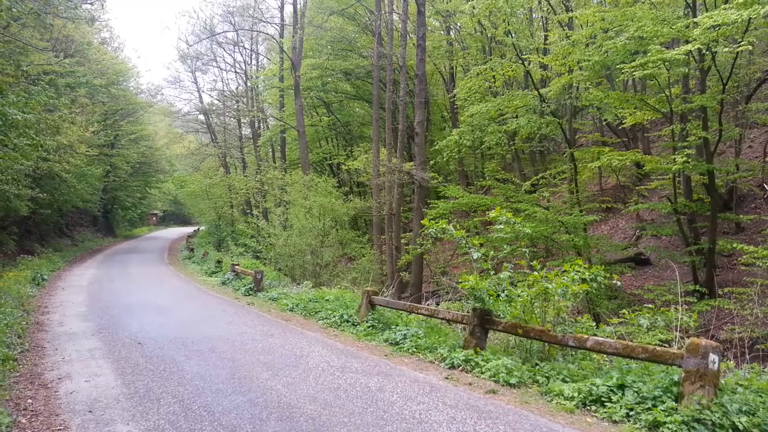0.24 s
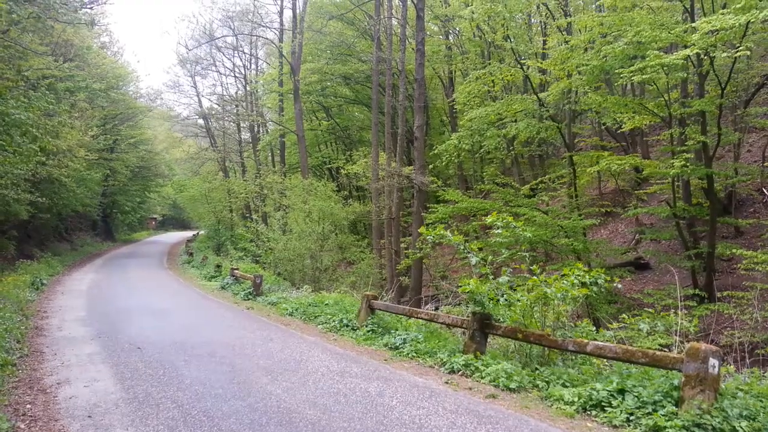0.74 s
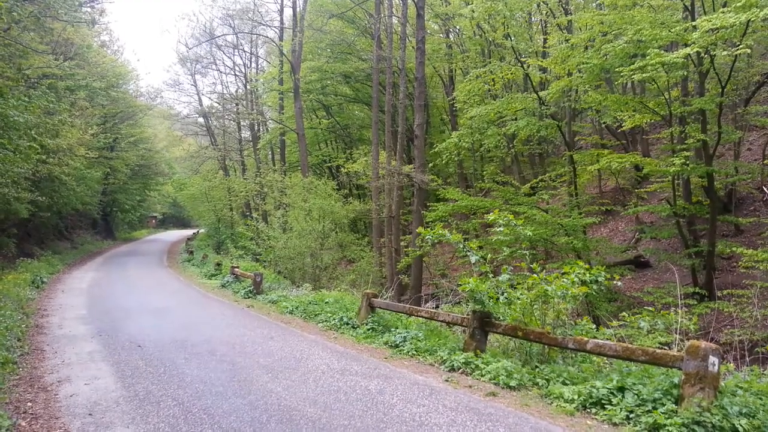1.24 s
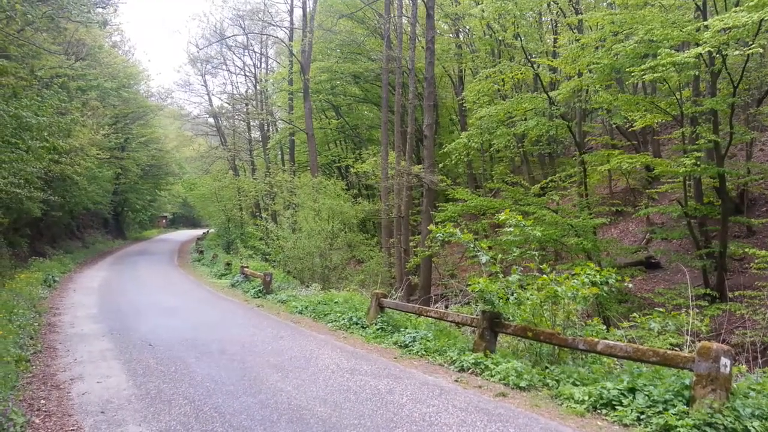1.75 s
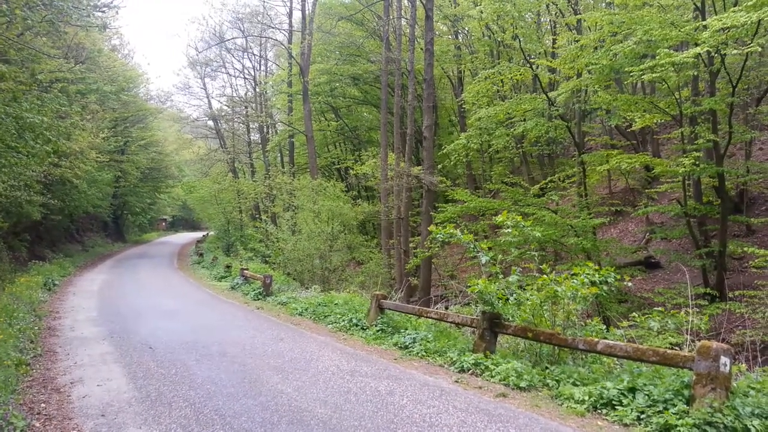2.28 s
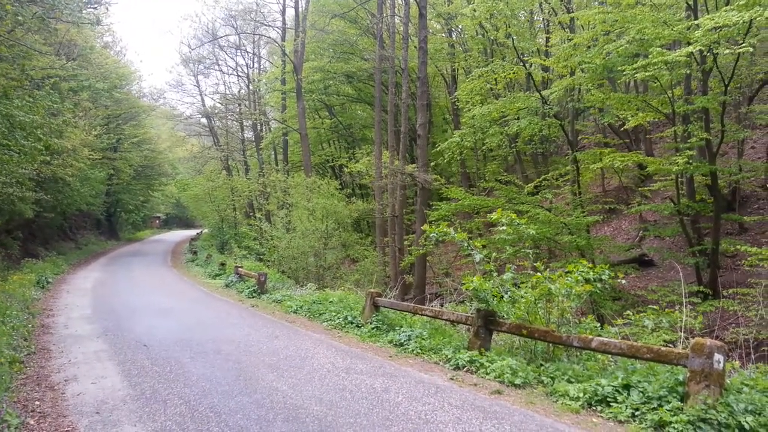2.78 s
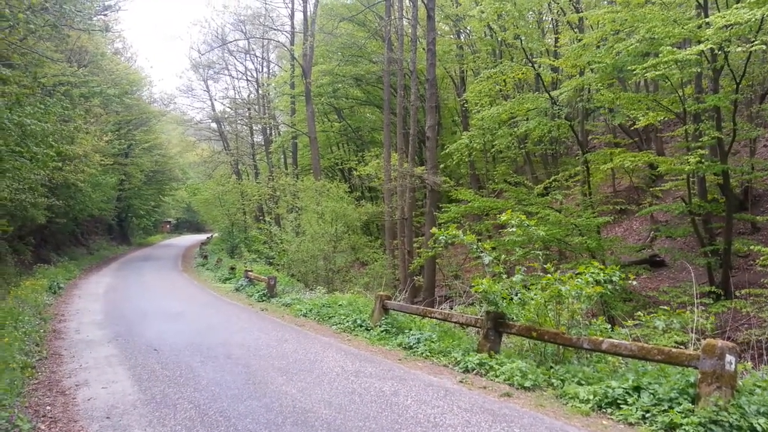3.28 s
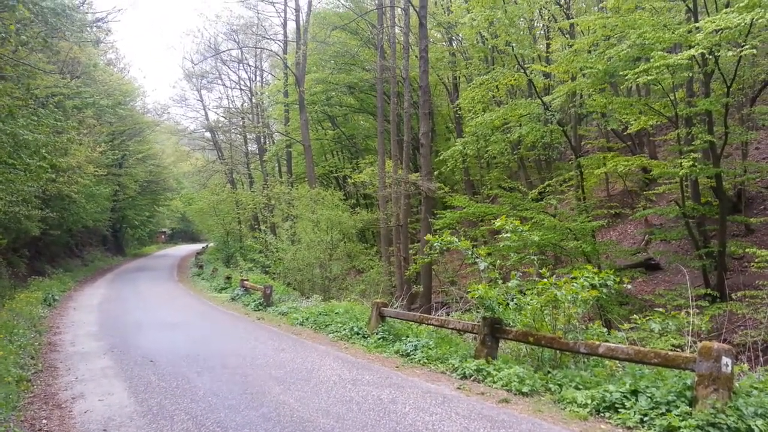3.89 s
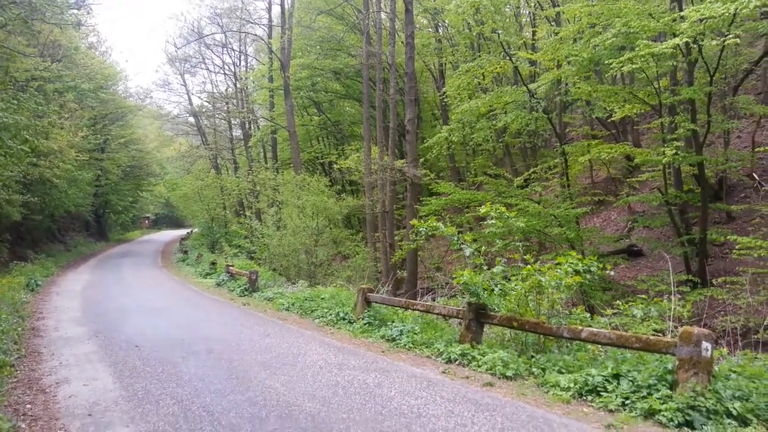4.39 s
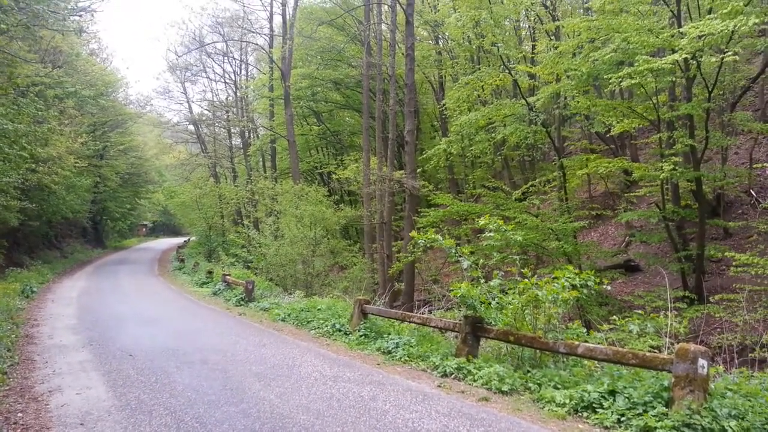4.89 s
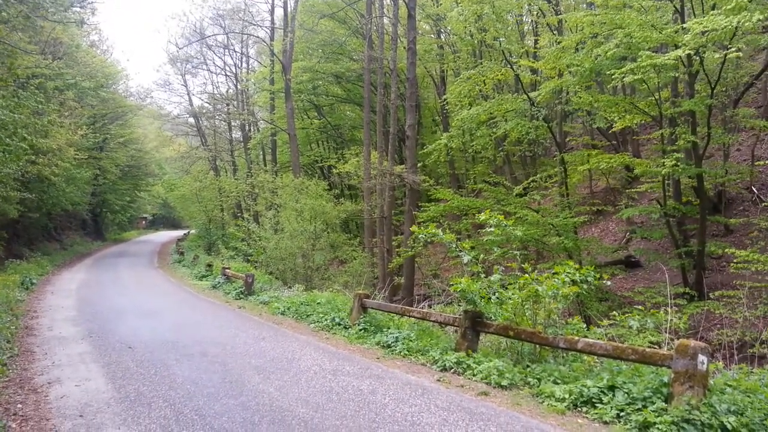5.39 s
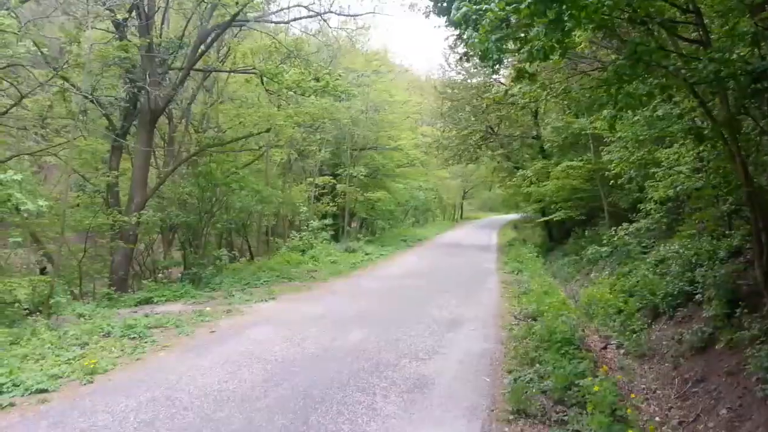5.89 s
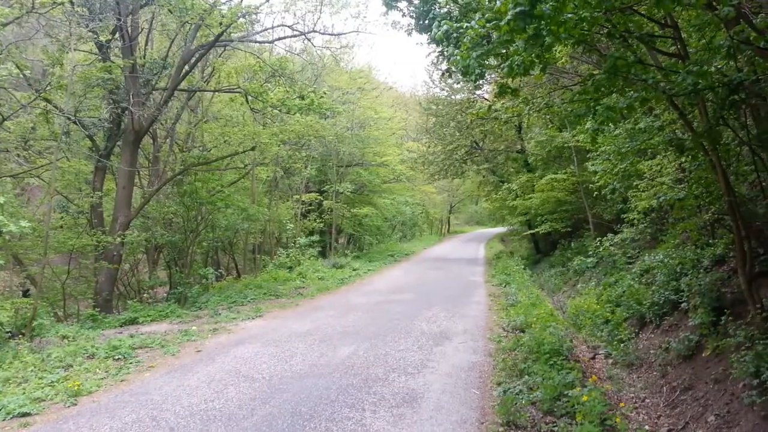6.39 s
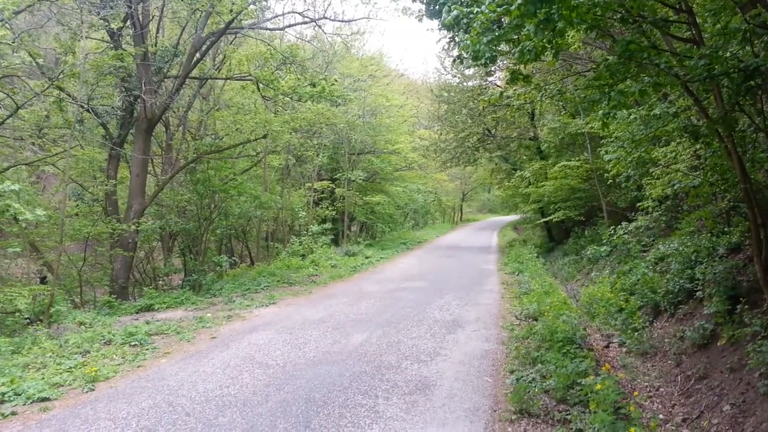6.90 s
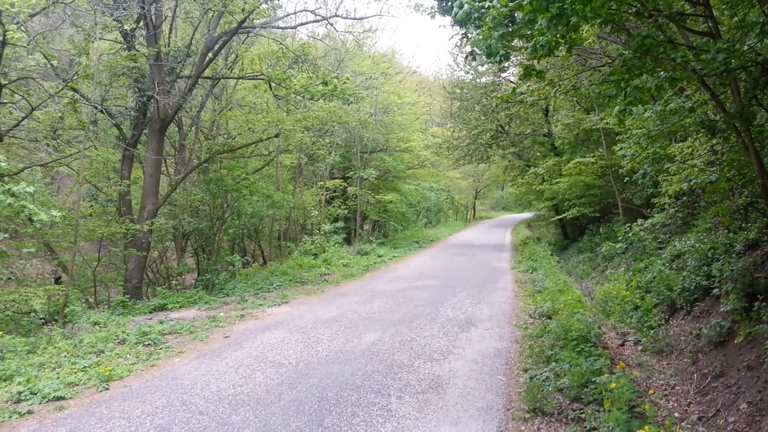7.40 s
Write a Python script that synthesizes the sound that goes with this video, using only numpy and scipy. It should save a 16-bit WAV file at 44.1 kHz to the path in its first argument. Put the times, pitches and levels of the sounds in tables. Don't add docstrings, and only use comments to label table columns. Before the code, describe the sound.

Several songbirds sing in a leafy wood beside a quiet lane: low fluting whistles, sharp high calls, thin wiry notes and short burrs, echoing off trunks. Leaves rush softly throughout. Low wind bursts thump the right side of a handheld microphone, hardest near two and a half seconds and again from four to nearly six. Plastic clicks dot the handling, one very loud; then the spot changes and it grows calmer.

```python
import sys
import numpy as np
from scipy import signal
from scipy.fft import rfft, irfft, next_fast_len
from scipy.io import wavfile
from scipy.ndimage import uniform_filter1d, map_coordinates

SR = 44100
rng = np.random.default_rng(int(sys.argv[2]) if len(sys.argv) > 2 else 0)


def file_out(sig):
    cols = np.atleast_2d(sig).T
    lim = np.clip(cols, -1, 1)
    pcm = np.round(lim * 32767).astype(np.int16)
    wavfile.write(sys.argv[1], SR, pcm)


def field_ratio(decibels):
    return 10 ** (np.asarray(decibels, dtype=float) / 20)


N = 337365
MOVE_S = 5.806


def unit(x):
    return x / np.sqrt(np.mean(x ** 2) + 1e-20)


def along(points, hz):
    f, v = np.transpose(points)
    return np.interp(np.log(hz + 1), np.log(f + 1), v)


def wobble(rate_hz, size=N):
    knots = rng.standard_normal(800 if size == N else 48)
    return map_coordinates(knots, [np.arange(size) * rate_hz / SR], mode="mirror")


def filtered(x, response):
    m = next_fast_len(N + SR // 2)
    return irfft(rfft(x, m) * response(np.fft.rfftfreq(m, 1 / SR)), m)[..., :N]


def spans(rows, edge_s):
    t = np.arange(N) / SR
    return [np.clip(np.minimum(t - s, s + length_s - t) / edge_s + 0.5, 0, 1) for s, length_s, *_ in rows]


def bumps(rows):
    t = np.arange(0, N, 32) / SR
    total = sum(top * np.exp(-((t - s) / abs(half_s)) ** 2) for s, half_s, top in rows)
    return np.interp(np.arange(N) / SR, t, total)


def add(track, s, sound, db, pan_db, lag=0):
    pan_db = np.clip(pan_db, -20, 20)
    for side, sign in enumerate((1, -1)):
        spot = track[side, round(s * SR) + side * lag:][:len(sound)]
        spot += field_ratio(db + sign * pan_db / 2) * sound[:len(spot)]


def clock(length_s):
    return np.arange(int(length_s * SR)) / SR


def whistle(hz, edge, lean):
    size = len(hz)
    u = np.linspace(0, 1, size)
    phase = 2 * np.pi * np.cumsum(hz * (1 + 0.0022 * wobble(82.0, size=size))) / SR
    swell = np.sin(np.pi * u ** lean) ** edge * unit(field_ratio(1.6 * wobble(60, size=size)))
    return swell * (np.sin(phase) + 0.036 * np.sin(2 * phase))


def held_notes():
    # start_s, length_s, pitch_hz, level_db (the same columns below)
    flute = [(0.413, 0.027, 2070, -61), (0.443, 0.1, 2072, -54.5), (0.85, 0.036, 2070, -56.5),
             (0.9, 0.04, 2000, -72), (1.235, 0.12, 2250, -66), (1.33, 0.18, 2620, -69),
             (1.875, 0.063, 1690, -56.5), (2.546, 0.056, 2130, -45), (2.6, .05, 2120, -51),
             (2.73, .03, 2120, -56), (3.17, 0.13, 2600, -63)]
    # start_s, length_s, pitch_hz, level_db
    rival = [(5.525, 0.1, 1862, -57)]
    # start_s, length_s, pitch_hz, level_db
    tit = [(0.1, 0.13, 4330, -62), (1.247, 0.065, 4400, -44), (1.449, 0.037, 4420, -45),
           (1.497, 0.026, 4423, -46)]
    # start_s, length_s, pitch_hz, level_db
    moved = [(5.807, 0.064, 2657, -56), (5.885, 0.062, 2658, -61), (5.925, .035, 2340, -62),
             (5.986, 0.042, 2351, -40.5), (6.055, 0.045, 2320, -51), (6.125, 0.083, 2626, -57),
             (6.27, 0.046, 2370, -64.5)]
    # start_s, length_s, pitch_hz, level_db
    seep = [(0.145, 0.14, 8356, -58), (3.738, 0.12, 8310, -53.5), (6.585, 0.15, 8220, -76)]
    # start_s, length_s, pitch_hz, level_db
    pipe = [(1.195, 0.06, 5160, -67), (3.2, 0.075, 5030, -61), (3.42, 0.14, 4800, -73),
            (3.6, 0.07, 4970, -62), (3.66, 0.083, 4950, -66), (7.195, 0.09, 4950, -70),
            (7.285, 0.077, 4990, -59), (7.36, 0.089, 4920, -68)]
    # start_s, length_s, pitch_hz, level_db
    far = [(2.91, 0.13, 3605, -65), (6.47, 0.042, 4315, -59), (7.012, 0.09, 3214, -65.5),
           (7.125, 0.061, 3201, -64), (7.19, 0.077, 3230, -70)]
    # notes, start_pitch_ratio, slide_s, pan_db (left-right), echo_db, right_lag_samples
    singers = [
        (flute, 0.98, 0.004, -3, -5, 15),
        (rival, 0.96, 0.006, -14, -3, 7),
        (tit, 0.99, 0.004, 0, -5, 4),
        (moved, 0.98, 0.004, 2.5, -6, 2),
        (seep, 1.053, 0.0071, -20, -1, 3),
        (pipe, 0.98, 0.008, 11, -3, 8),
        (far, 1.005, 0.014, -2, -3, 11),
    ]
    notes = []
    for rows, scoop, slide_s, pan_db, echo_db, lag in singers:
        for s, length_s, hz, db in rows:
            pitch_hz = hz * (1 + (scoop - 1) * np.exp(-clock(length_s) / slide_s))
            notes.append((s, whistle(pitch_hz, edge=0.43, lean=0.52), db, pan_db, echo_db, lag))
    return notes


def gliding_notes():
    # start_s, length_s, from_hz, to_hz, level_db
    flute = [(0.182, 0.09, 1900, 1660, -75), (0.54, 0.037, 1933, 1750, -61),
             (0.79, 0.11, 2363, 2330, -64.5), (1.05, 0.076, 1590, 1800, -68.5),
             (1.954, 0.025, 1550, 1410, -56.5), (2.08, 0.076, 2183, 2024, -53),
             (2.15, 0.079, 1988, 1940, -51), (2.225, 0.05, 1984, 1923, -59), (2.25, 0.078, 1930, 1775, -58),
             (2.365, 0.025, 2750, 2720, -54), (2.41, .03, 2760, 2640, -58), (2.527, 0.03, 1720, 2115, -48),
             (2.825, 0.015, 600, 715, -51), (2.84, 0.034, 2040, 2190, -60), (2.85, 0.031, 2490, 2630, -57),
             (2.85, 0.035, 1730, 1790, -63), (2.55, 0.027, 1960, 2050, -58), (5.825, 0.02, 2250, 2490, -53),
             (6.1, 0.03, 2360, 2570, -69)]
    # start_s, length_s, from_hz, to_hz, level_db
    rival = [(5.722, 0.085, 2460, 2050, -56.5)]
    # start_s, length_s, from_hz, to_hz, level_db
    warbler = [(1.21, 0.015, 5400, 6350, -63), (1.31, 0.23, 8340, 7570, -74),
               (1.413, 0.02, 5400, 6700, -60), (3.18, 0.049, 6300, 6580, -58.5),
               (3.215, 0.063, 6600, 6680, -57), (3.29, 0.12, 6750, 7200, -65.5),
               (3.54, 0.06, 7050, 6740, -66), (3.6, 0.048, 6680, 6560, -62), (3.66, 0.042, 6560, 6240, -65),
               (3.772, 0.017, 7260, 5800, -59), (3.846, 0.018, 7270, 6600, -64),
               (4.03, 0.014, 6500, 7000, -60), (4.042, 0.0081, 7120, 6530, -61),
               (6.64, 0.099, 8350, 8260, -76)]
    # start_s, length_s, from_hz, to_hz, level_db
    pipe = [(2.24, 0.2, 5600, 5500, -60), (3.535, 0.032, 3500, 4570, -63), (3.57, .03, 4600, 4950, -58),
            (3.791, 0.02, 6000, 4840, -70), (7.295, 0.042, 4980, 4420, -53), (7.335, 0.02, 4560, 5100, -60)]
    # start_s, length_s, from_hz, to_hz, level_db
    plunges = [(1.228, 0.022, 3620, 4380, -61), (1.427, 0.022, 3250, 4380, -60)]
    # start_s, length_s, from_hz, to_hz, level_db
    alarm = [(2.722, 0.036, 6570, 4750, -54), (2.74, 0.012, 7770, 7470, -52),
             (2.748, 0.027, 7540, 4300, -46), (2.773, 0.014, 4330, 4020, -49.5),
             (2.785, 0.027, 4050, 3900, -54), (2.778, 0.043, 6500, 6360, -56)]
    # notes, pan_db (left-right), echo_db, bend (over 1 speeds up), right_lag_samples
    singers = [
        (flute, 9, -4, 1.05, 10),
        (rival, -19, -11, 1.9, 0),
        (warbler, -20, -3.5, 0.95, 3),
        (pipe, 7, -3.5, 1.05, 11),
        (plunges, 0, -15, 0.7, 7),
        (alarm, -1.5, -3, 1.1, 7),
    ]
    notes = []
    for rows, pan_db, echo_db, bend, lag in singers:
        for s, length_s, from_hz, to_hz, db in rows:
            pitch_hz = from_hz + (to_hz - from_hz) * (clock(length_s) / length_s) ** bend
            notes.append((s, whistle(pitch_hz, edge=0.12, lean=0.9), db, pan_db, echo_db, lag))
    return notes


def burred_notes():
    # start_s, length_s, centre_hz, swing_hz, level_db
    burrs = [
        (2.393, 0.17, 2540, 200, -52),
        (3.764, 0.25, 3676, 322, -53.5),
        (5.628, 0.26, 3572, 423, -53),
    ]
    pan_db, echo_db, lag = 4.5, -2.5, 14
    notes = []
    for s, length_s, centre_hz, swing_hz, db in burrs:
        t = clock(length_s)
        cycle = np.cumsum(105 * field_ratio(2.3 * wobble(61.2, size=len(t)))) / SR % 1
        sweep = 1 - 2 * cycle ** 1.3 + 0.227 * wobble(89.9, size=len(t))
        sweep *= np.minimum(1, 0.35 + 3 * t / length_s)
        tone = whistle(centre_hz + swing_hz * sweep, edge=0.59, lean=0.68)
        notes.append((s, 1.49 * np.sin(np.pi * cycle) * tone, db, pan_db, echo_db, lag))
    return notes


def birds():
    direct, sent = np.zeros((2, 2, N)), np.zeros((2, 2, N))
    for s, note, db, pan_db, echo_db, lag in held_notes() + gliding_notes() + burred_notes():
        spot = int(s + len(note) / SR / 2 > MOVE_S)
        add(direct[spot], s, note, db + 0.5, pan_db, lag=lag)
        add(sent[spot], s, note, db + 6.0 + echo_db, pan_db)
    return direct, sent


def echoes(x):
    # pitch_hz, t60_s
    trunks_t60 = [(1500, 0.81), (4500, 0.74), (9000, 0.33)]
    near_db, near_t60_s = 2, 0.16
    hop, out = SR // 3, np.zeros((2, N + 2 * SR))
    for start in range(0, N, hop):
        piece = x[:, start:start + hop]
        if not piece.any():
            continue
        hz, t, z = signal.stft(rng.standard_normal((2, SR * 3 // 4)), SR, nperseg=256)
        decay = field_ratio(-60 * t / along(trunks_t60, hz)[:, None]) + field_ratio(near_db - 60 * t / near_t60_s)
        tail = signal.istft(z * decay, SR, nperseg=256)[1]
        piece = 0.86 * piece + 0.14 * piece[::-1]
        wet = signal.fftconvolve(piece, tail / np.linalg.norm(tail[0]), axes=1)
        wet *= np.linalg.norm(piece, axis=1, keepdims=True) / np.linalg.norm(wet, axis=1, keepdims=True)
        out[:, start + 300:][:, :wet.shape[1]] += wet
    return out[:, :N]


def chorus():
    direct, sent = birds()
    early = np.arange(N) < MOVE_S * SR
    wet = echoes(sent[0]) * early + echoes(sent[1])
    flutter_db = 3 * np.array([wobble(45), wobble(45)])
    return np.where(early, *direct) + wet * field_ratio(flutter_db)


def wind():
    # centre_s, peak_db, pitch_hz
    eddies = [(2.321, -22, 101), (2.36, -31, 130), (2.394, -35, 100), (2.41, -11, 163), (2.428, -38, 130),
              (2.44, -25, 140), (2.454, -30, 98), (2.481, -29, 108), (2.53, -33, 112), (2.566, -29, 107),
              (2.661, -37, 82.5), (2.7, -28.5, 88.5), (3.941, -32.5, 96), (4.03, -38, 96),
              (4.159, -27.5, 103), (4.203, -29, 93.5), (4.438, -33, 120), (4.478, -38, 170),
              (4.52, -38, 85), (4.583, -25.5, 95), (4.632, -35.5, 129), (4.679, -40, 95), (4.734, -32, 94),
              (4.876, -42, 80), (5.13, -33, 100), (5.255, -36, 105), (5.36, -40, 80), (5.49, -31.5, 95),
              (5.589, -33, 95), (5.64, -47, 100), (4.489, -26.5, 140), (4.554, -34, 132), (4.595, -28, 102),
              (4.754, -32, 91), (4.839, -27, 91), (5.01, -36, 95), (5.165, -25, 98), (5.197, -27, 105),
              (5.285, -28, 124), (5.318, -29.5, 107), (5.524, -26.5, 93), (5.549, -26.5, 101),
              (5.671, -25, 104), (5.723, -24, 133), (5.753, -26.5, 109), (5.788, -32, 130)]
    # centre_s, peak_db
    puffs = [
        (0.79, -44),
        (1.89, -28),
        (2.11, -32),
        (7.26, -37),
    ]
    # start_s, length_s, level_db
    spells = [(0, 0.28, -64), (0.74, 0.27, -56), (1.223, 0.52, -57.5), (2.052, 0.3, -61.5),
              (2.28, 0.52, -53), (3.862, 0.52, -57), (4.41, 0.35, -55), (4.84, 0.31, -54.5),
              (5.103, 0.34, -62), (5.486, 0.33, -50), (5.844, 0.62, -70)]
    # pitch_hz, level_db per Hz
    buffet_tone = [(20, -28), (45, -7), (100, 5), (170, -13), (300, -18), (600, -51)]
    swell_db, swell_half_s = -19.5, 0.026
    calm_db, spell_edge_s = -69.5, 0.079
    swells = bumps([(s, swell_half_s, field_ratio(db + swell_db)) for s, db, *_ in [*eddies, *puffs]])
    steady = sum(field_ratio(row[2]) * on for row, on in zip(spells, spans(spells, spell_edge_s)))
    gust = field_ratio(calm_db) + swells + steady
    noise = filtered(rng.standard_normal((2, N)), lambda hz: field_ratio(along(buffet_tone, hz)))
    port = np.zeros((2, N))
    t = np.arange(-2000, 2000) / SR
    for s, db, hz in eddies:
        eddy = np.exp(-(t * hz / 0.61) ** 2) * np.cos(2 * np.pi * hz * t + rng.normal(-0.72, 0.37))
        add(port, s - 2000 / SR, eddy, db - 12.5, -20)
    lumps = unit(noise * field_ratio(2.5 * wobble(18)))
    return port * field_ratio([[-14], [0]]) + lumps * gust * field_ratio([[-20], [0]])


def case_ring(t, hz, side):
    body_hz = 2120
    v = t - 0.0006
    late = v - 0.00007 * side
    modes = np.cos(2 * np.pi * hz * (1 + 0.12 * side) * late)
    modes += (0.06 + 0.2 * side) * np.cos(2 * np.pi * 2.1 * hz * late)
    modes += 0.1 * np.cos(2 * np.pi * 1.75 * hz * v)
    modes += 0.25 * np.cos(2 * np.pi * 0.72 * hz * v + rng.normal(0, 0.5))
    spread_s = np.where(v < 0, 0.00017 + 0.00016 * side, 0.00022 + 0.00022 * side)
    ring = modes / 1.3 * np.exp(-(v / spread_s) ** 2)
    u = np.maximum(t - 0.0004, 0)
    late_mode = np.sin(2 * np.pi * 1.32 * hz * t + rng.uniform(0, 14.0))
    ring += 0.074 * late_mode * field_ratio(-60 * u / 0.0019) * np.minimum(1, u / 0.0015)
    ring += 0.081 * np.sin(2 * np.pi * body_hz * u) * field_ratio(-60 * u / 0.0018)
    push = np.sin(np.pi * t / t[-1]) * np.exp(-t / 0.002)
    return ring + 0.032 * push


def ticks():
    # start_s, peak_db, pan_db (left-right), ring_hz, snap_db
    clicks = [(.195, -38, -5, 6300, -14), (.452, -44, -5, 6300, -14), (1.564, -40, -3, 6600, -7),
              (1.735, -45, -3, 7730, -4), (3.638, -53, -6, 6540, 2), (3.9922, -39, 1, 3720, 3),
              (4.11, -33, -2, 4450, -2), (4.2382, -40, 6, 6350, 4), (4.282, -30, 9, 5500, -4.5),
              (4.6654, -6.6, 11, 5900, -26), (4.8497, -41.5, -16, 6070, -5), (5.0335, -41, 4, 6350, -9),
              (5.231, -34.5, -9, 5960, -11), (5.3714, -45, -2.5, 6860, -12), (5.682, -31.5, 8, 3300, -3.5),
              (6.322, -40, 3, 1890, -23), (6.367, -34.5, -7, 6460, -28), (6.44, -45, -7, 6000, -8),
              (6.518, -41, -1, 5000, -8), (7.05, -43, -3, 5960, -10), (7.071, -42, 4, 2580, -16),
              (7.123, -44, 0, 6600, -12)]
    case, t = np.zeros((2, N)), np.arange(220) / SR
    u = np.maximum(t - 0.0004, 0)
    snap_rise = np.minimum(1, u / 0.000052)
    for s, db, pan_db, hz, snap_db in clicks:
        for side, sign in enumerate((1, -1)):
            ring = case_ring(t, hz, side)
            noise = np.diff(rng.standard_normal(len(t) + 1))
            snap = noise * field_ratio(snap_db - 60 * u / 0.0042) * snap_rise
            at = round((s + 0.00086) * SR) + 3 * side
            case[side, at:at + len(t)] += field_ratio(db + sign * pan_db / 2) * (ring + snap)
    return case


def air():
    # time_s, level_db
    breeze = [(0.0, -62.5), (0.62, -64), (0.96, -62.5), (1.96, -62.5), (2.24, -59), (2.73, -58.5),
              (2.94, -62), (4.88, -60.5), (5.32, -62), (5.65, -60), (5.8, -62), (6.75, -67), (7.22, -65.5),
              (7.65, -68)]
    # centre_s, half_width_s, rise_db
    stirs = [
        (.1, 0.27, 1.8),
        (1.4, 0.19, 2.9),
        (2.72, 0.25, 3),
        (3.2, 0.13, 2.5),
        (3.9, 0.13, 5.2),
        (5.15, 0.15, 2.9),
        (5.7, .08, 4.3),
        (6.4, 0.17, 1.3),
        (7.3, 0.16, 0.74),
    ]
    # pitch_hz, level_db per Hz
    left_tone = [(30, -43), (60, -23), (110, -25.5), (200, -21), (350, -28), (700, -29), (1300, -30.5),
                 (2800, -35), (4200, -33.5), (5500, -35), (6600, -40.5), (8000, -44), (10500, -45.5),
                 (14400, -48)]
    # pitch_hz, level_db per Hz
    right_tone = [(30, -25.5), (60, -27), (110, -32.5), (200, -23), (350, -31.5), (700, -31), (1300, -30),
                  (2800, -33.5), (4200, -36.5), (5500, -35), (6600, -28), (8000, -38.5), (10500, -44),
                  (14400, -48)]
    # pitch_hz, likeness
    alike = [(60, 0.96), (250, 0.69), (700, 0.67), (1500, 0.14), (2500, 0.11), (4500, 0.013)]
    # pitch_hz, lead_rad
    lead = [(100, 0.082), (1200, 0.93), (1700, 2.76), (2200, 7.3), (4000, 10.7)]
    rush_db = np.interp(np.arange(N) / SR, *np.transpose(breeze))
    leaves_db = -63.5 + 0.89 * (rush_db + 62.5) + bumps(stirs)

    z = signal.stft(rng.standard_normal((2, N)), nperseg=512)[2]
    patches = uniform_filter1d(rng.standard_normal(z.shape[1:]), 6, 0)
    patches = uniform_filter1d(patches, 14, 1)
    pair = signal.istft(z * field_ratio(1.0 * unit(patches)), nperseg=512)[1][:, :N]

    def mid_side_gain(hz):
        angle = np.arccos(np.clip(along(alike, hz), -1, 1)) / 2
        return np.array([np.cos(angle), np.sin(angle)])

    mid, side = filtered(pair, mid_side_gain)
    first = filtered(mid - side, lambda hz: np.exp(-1j * along(lead, hz)))
    second = np.roll(mid - side, -15)
    right = np.where(np.arange(N) < MOVE_S * SR, first, second)
    ports = filtered(np.array([mid + side, right]),
                     lambda hz: field_ratio([along(left_tone, hz), along(right_tone, hz)]))
    rush = filtered(ports, lambda hz: 1 / (1 + (hz / 3000) ** 2) / (1 + (200 / (hz + 1)) ** 2))
    hiss = filtered(ports, lambda hz: 1 / (1 + (9000 / (hz + 1)) ** 4))
    hum = filtered(ports, lambda hz: 1 / (1 + (hz / 200) ** 2))
    leaves = ports - rush - hiss - hum
    flutter_db = 0.7 * wobble(4.2)
    drone = field_ratio(2 * wobble(3)) * hum
    moving = field_ratio(rush_db + 63) * rush + field_ratio(leaves_db + 63.5 + flutter_db) * leaves
    ends = field_ratio(0.3 * (leaves_db + 78.0)) * hiss + field_ratio(0.27 * (rush_db + 57.5)) * drone
    return field_ratio(-17) * (moving + ends)


def buzz():
    # pitch_hz, level_db
    buzz_tone = [(5000, -40), (6500, -6), (8500, -6), (9600, 0), (10700, 0), (11600, -7), (12300, -6),
                 (14500, -16)]
    # start_s, length_s, drop_db
    pauses = [
        (.0, 0.1, 3),
        (.7, 0.46, 2),
        (1.612, 0.33, 2.5),
        (3.4, .1, 12),
        (3.69, 0.59, 8),
        (4.744, 0.23, 8),
        (5.19, 0.57, 11),
    ]
    pulse_hz = 650 / 3
    t = np.arange(N) / SR
    buzz_db = np.where(t < MOVE_S, -59, -62.5)
    buzz_db = buzz_db - sum(row[2] * on for row, on in zip(pauses, spans(pauses, 0.048)))
    comb = np.zeros(N)
    for k in range(26, 67):
        gain = field_ratio(along(buzz_tone, k * pulse_hz) + rng.uniform(-1.1, 1))
        comb += gain * np.sin(2 * np.pi * k * pulse_hz * t + rng.uniform(0, 1.6))
    frame = SR // 50
    sending = np.repeat(rng.random(N // frame + 1) > 0.3, frame)[:N] | (t > 2.76)
    gate = uniform_filter1d(sending * 1.0, size=200)
    return field_ratio(buzz_db - 1.0) * unit(comb) * gate * field_ratio([[-30], [0]])


def scene():
    case = filtered(ticks(), lambda hz: (1j * hz / (120 + 1j * hz)) / (1 + (hz / 13800) ** 12))
    return case + filtered(chorus() + wind() + air() + buzz(), lambda hz: hz < 14520)


def roll_off(x):
    return signal.sosfilt(signal.butter(12, 15450, fs=SR, output="sos"), x)


def record(dry):
    coloured = filtered(dry, lambda hz: 1j * hz / (25 + 1j * hz))
    rounded = filtered(coloured, lambda hz: 1 / (1 + (hz / 16000) ** 40))
    return roll_off(rounded)


dry = scene()
out = record(dry)
file_out(out)
```